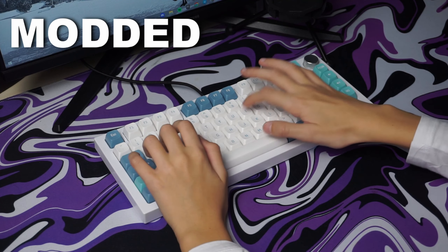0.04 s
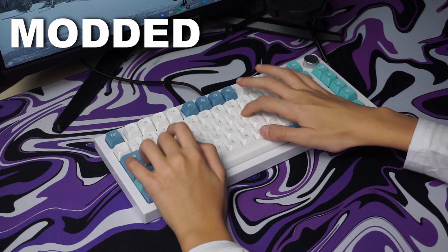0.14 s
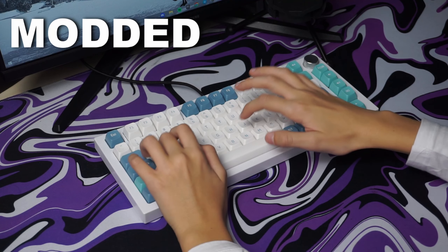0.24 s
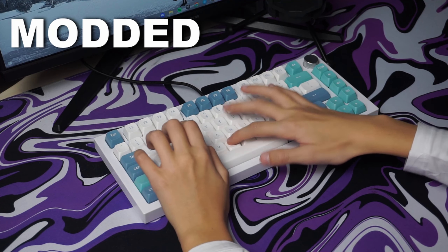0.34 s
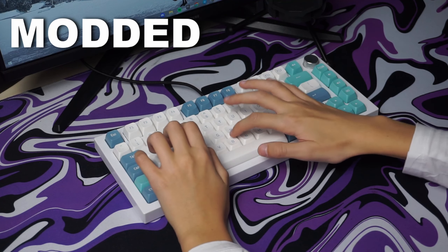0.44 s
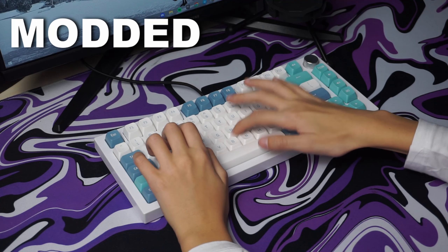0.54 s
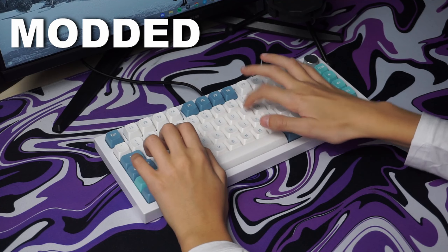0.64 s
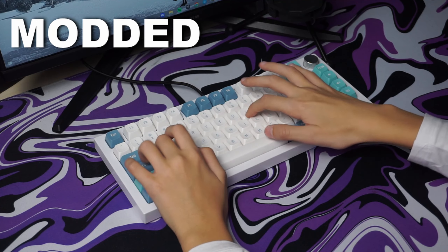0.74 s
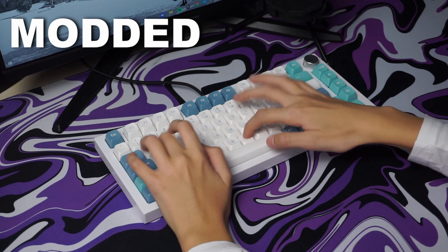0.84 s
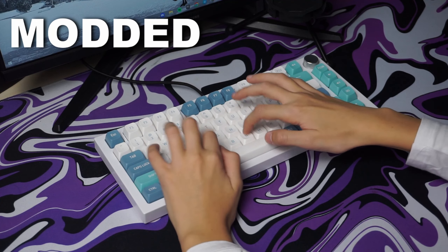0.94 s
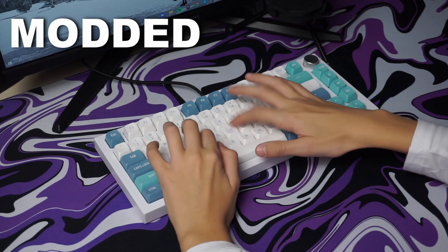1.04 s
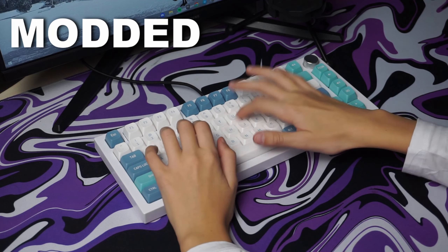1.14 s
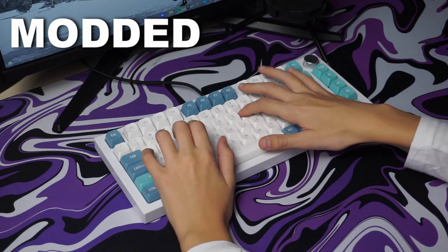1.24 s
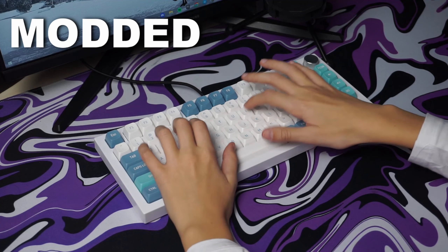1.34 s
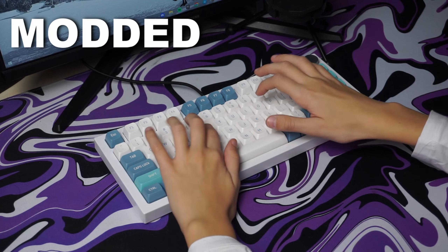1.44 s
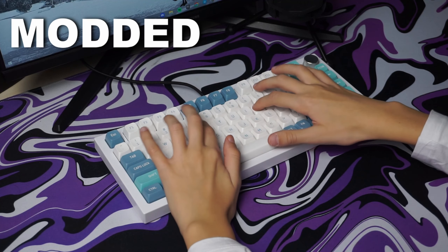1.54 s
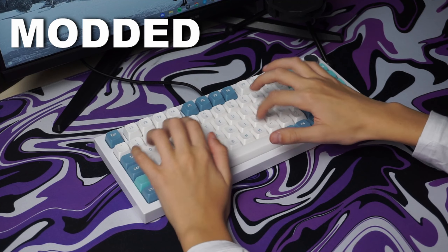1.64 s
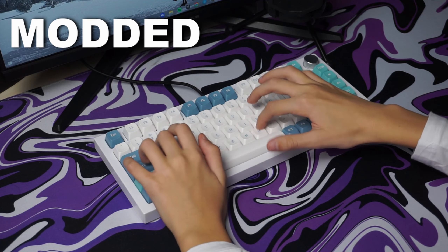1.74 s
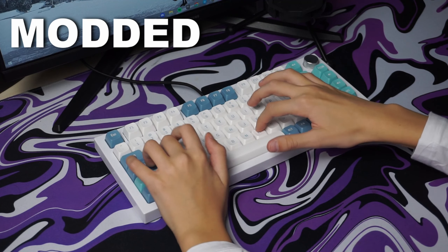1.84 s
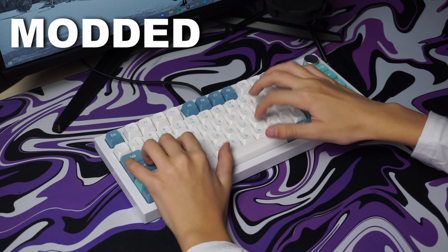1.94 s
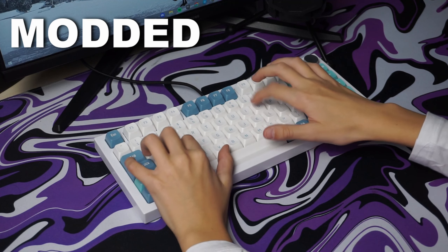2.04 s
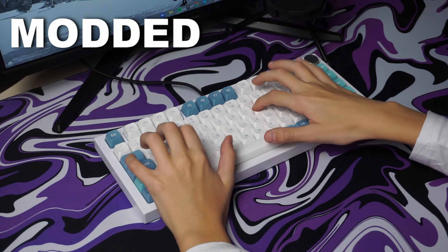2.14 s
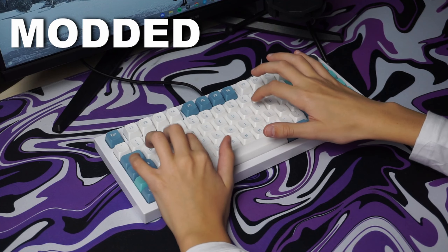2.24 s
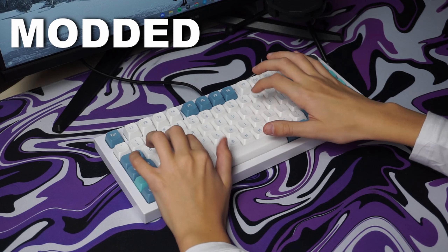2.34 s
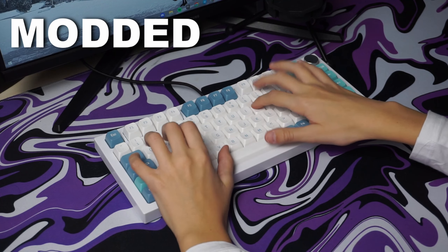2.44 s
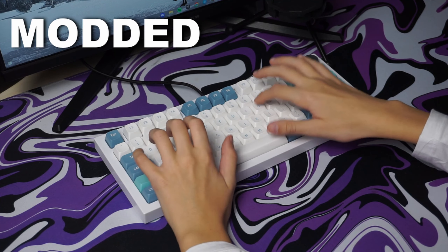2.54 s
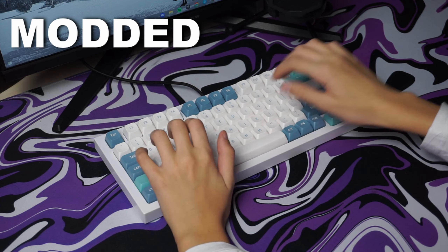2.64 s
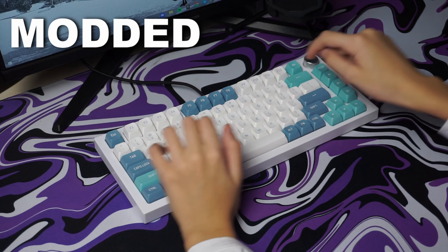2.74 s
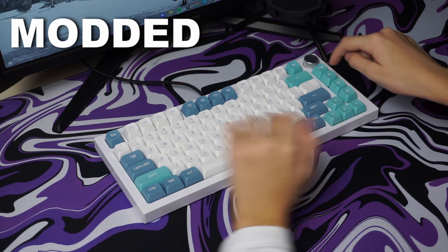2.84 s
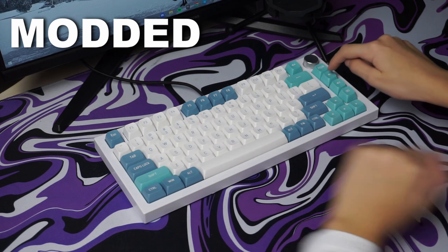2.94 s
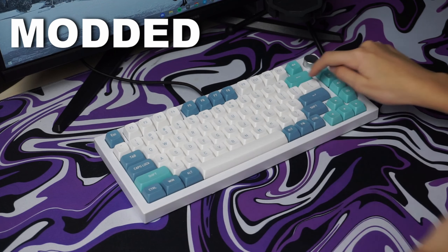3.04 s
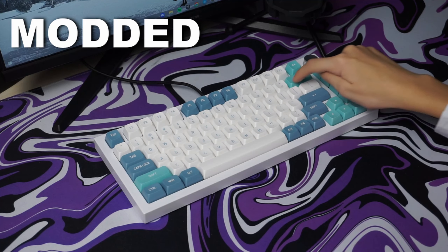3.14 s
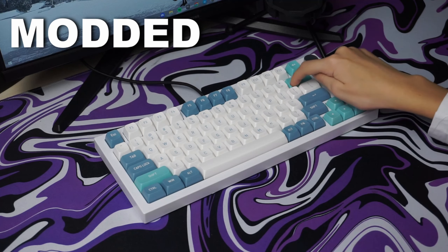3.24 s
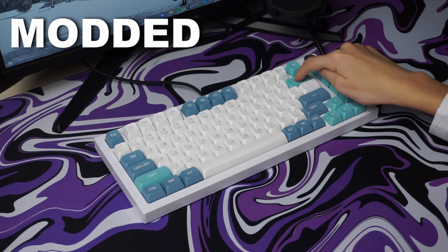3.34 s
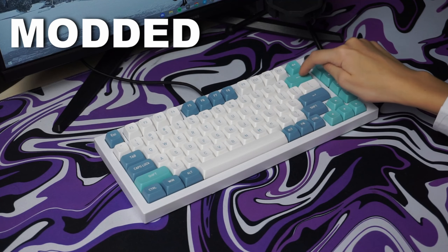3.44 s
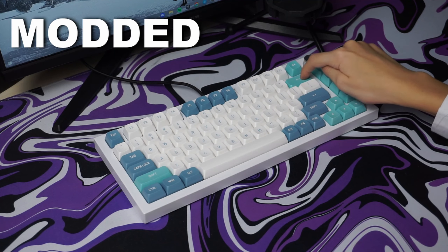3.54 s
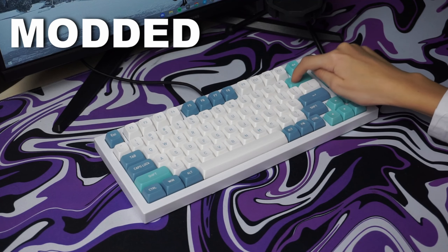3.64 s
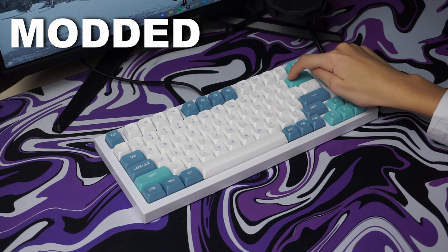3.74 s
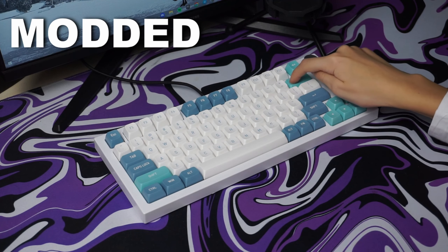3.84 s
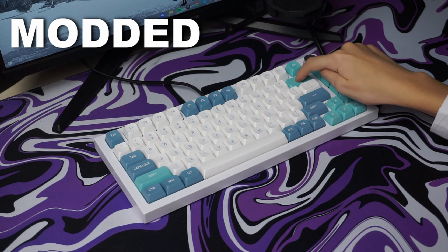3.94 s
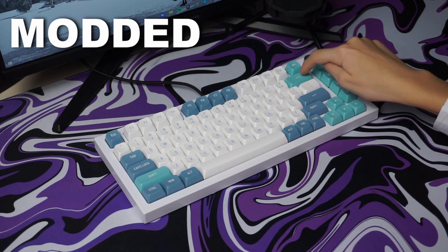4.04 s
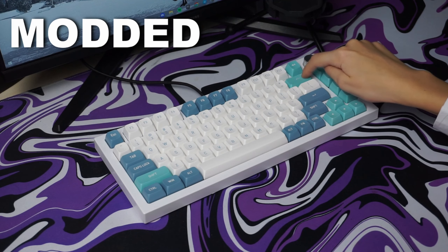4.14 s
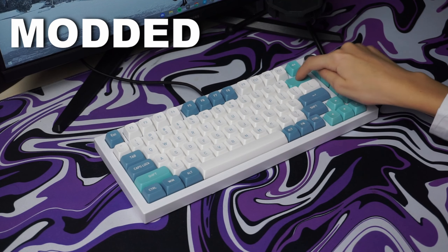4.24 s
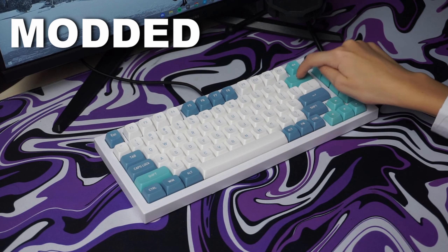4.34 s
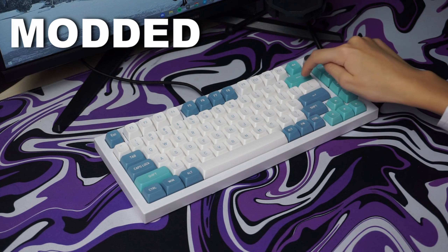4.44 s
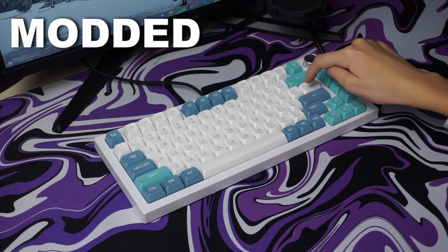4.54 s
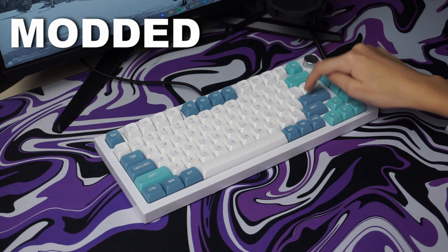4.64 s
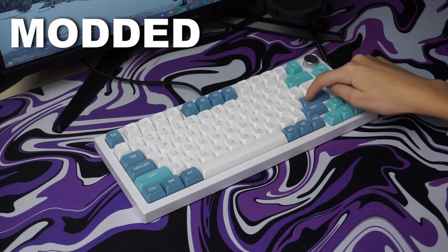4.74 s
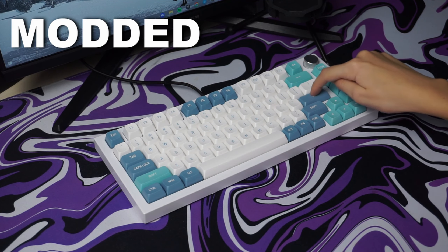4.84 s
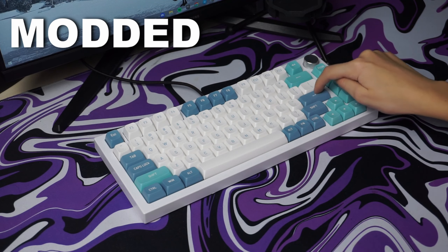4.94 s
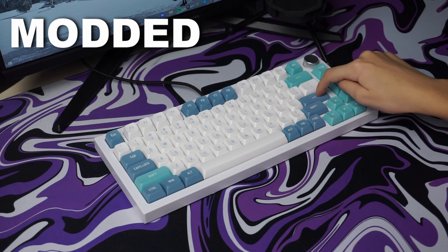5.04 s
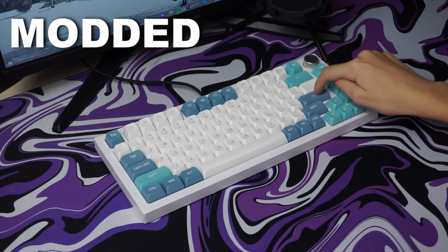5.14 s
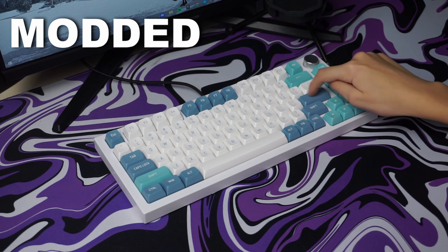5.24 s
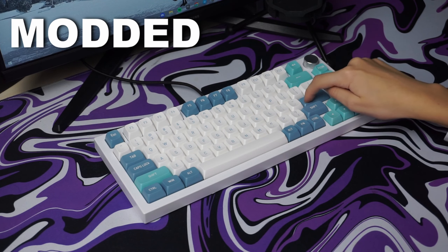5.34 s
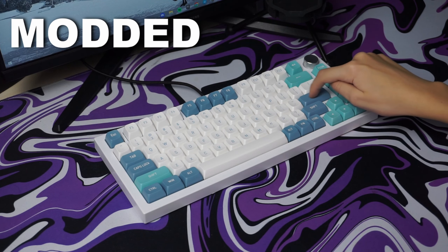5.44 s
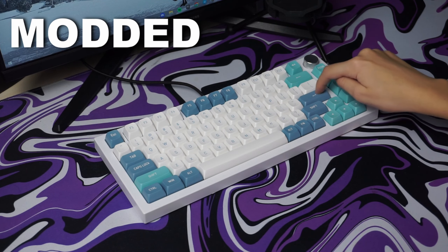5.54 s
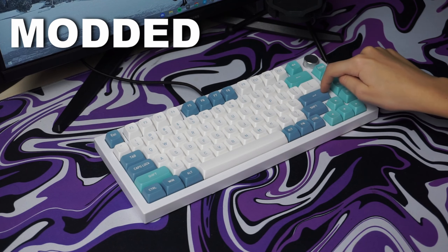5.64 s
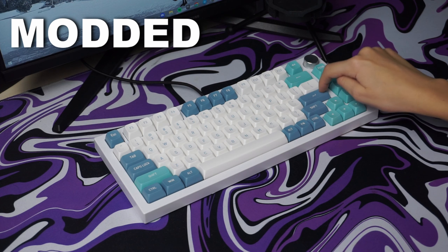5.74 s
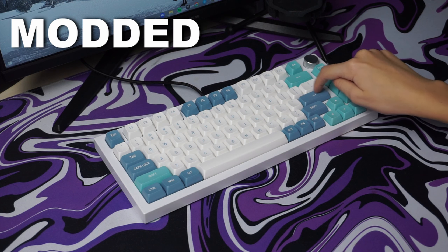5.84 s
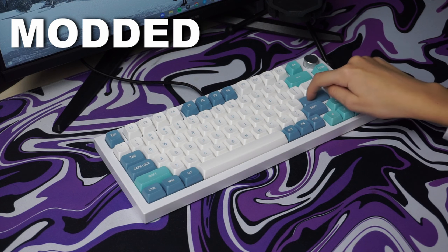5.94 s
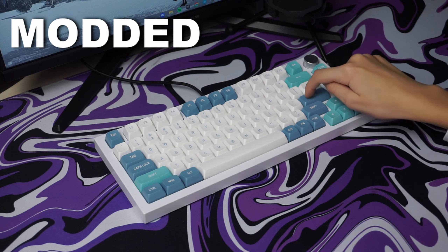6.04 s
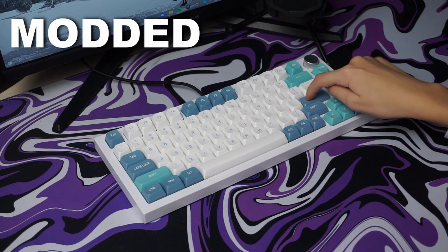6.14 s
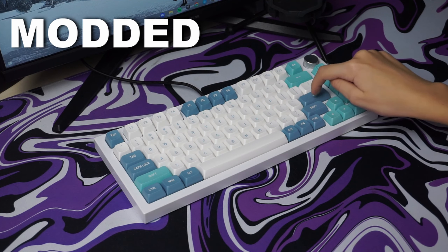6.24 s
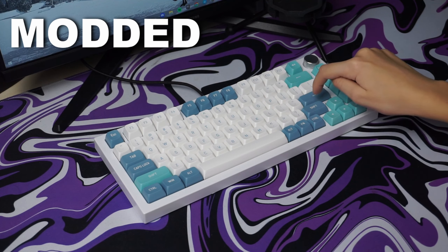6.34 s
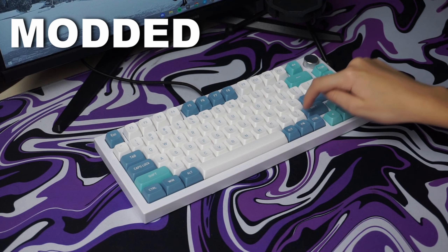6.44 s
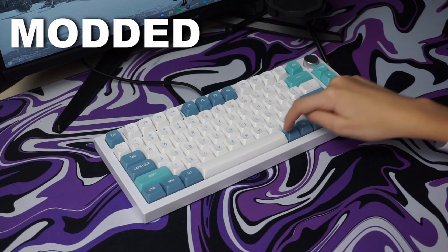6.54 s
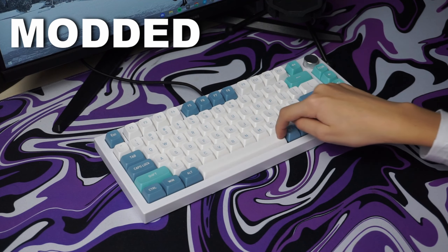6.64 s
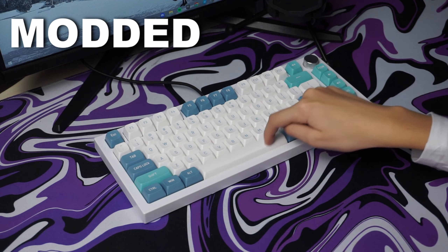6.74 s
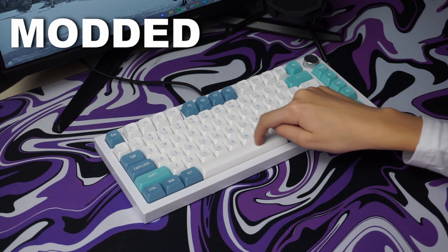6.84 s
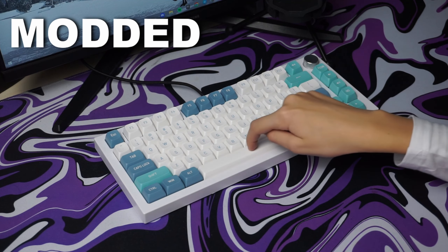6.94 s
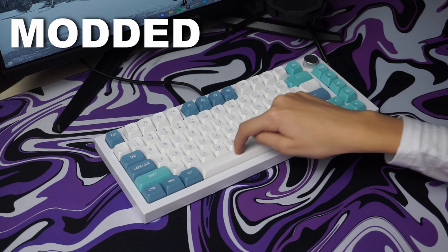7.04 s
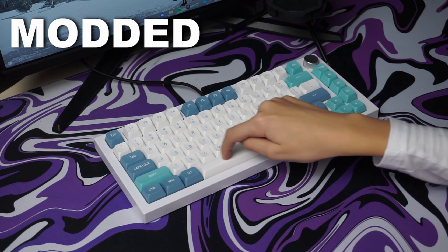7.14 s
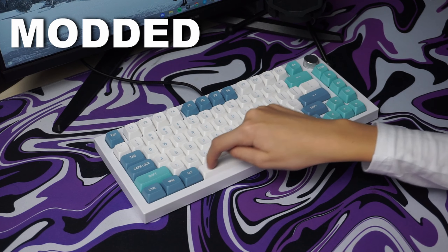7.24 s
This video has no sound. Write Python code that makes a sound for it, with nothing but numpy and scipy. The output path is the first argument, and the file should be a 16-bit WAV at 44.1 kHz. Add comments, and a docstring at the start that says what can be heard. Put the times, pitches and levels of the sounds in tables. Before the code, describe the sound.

Two hands type on a muted mechanical keyboard, then one finger taps backspace, enter and the space bar in separate runs.

```python
"""Quick, woody clacks: two hands type a phrase on a damped mechanical keyboard, close up in a small room.
Then one finger taps backspace, enter and the space bar in turn. Each key knocks as it bottoms out and
again as it springs back: plastic clacks, spring and plate ring faintly, the desk thuds under its mat.
Beneath lie room tone, desk sway and the brush of skin and sleeve. The hardest hits clip at full scale."""
import sys
import numpy as np
from scipy import signal
from scipy.fft import rfft, irfft
from scipy.io import wavfile

SR = 44100
rng = np.random.default_rng(int(sys.argv[2]) if len(sys.argv) > 2 else 0)


def to_wav(s):
    """Save 16-bit WAV."""
    ch = np.atleast_2d(s).T  # columns
    pcm = np.round(np.clip(ch, -1, 1) * 32767)  # PCM
    wavfile.write(sys.argv[1], SR, pcm.astype(np.int16))


N = 321489
STROKE_S = .4
T = np.arange(int(STROKE_S * SR)) / SR
CLACK_LOW_HZ, CLACK_HIGH_HZ = 1600, 3500  # thock lies below this band, tick above it


def undb(db):
    return 10 ** (np.asarray(db) / 20)


def unit(x):
    """Scale to rms 1."""
    return x / np.sqrt(np.mean(x ** 2))


def attack_rms(x, attack_s=.006):
    return np.sqrt(np.mean(x[:int(attack_s * SR)] ** 2))


def fade(t60_s, t=T):
    """Exponential decay, 60 dB down after t60_s."""
    return np.exp(-np.log(1000) * t / t60_s)


def since(start_s):
    """Seconds since start_s; zero before it."""
    return np.maximum(np.arange(N) / SR - start_s, 0)


def butter(x, hz, kind, order=2):
    return signal.sosfilt(signal.butter(order, hz, kind, fs=SR, output="sos"), x)


def filtered_noise(size, hz, kind, order=2):
    return unit(butter(rng.standard_normal(size), hz, kind, order))


def coloured_noise(colour, size):
    """Noise of rms 1, shaped by (freq_hz, gain_db) points."""
    hz, db = np.transpose(colour)
    freq_hz = np.fft.rfftfreq(size, 1 / SR)
    gain = undb(np.interp(np.log(freq_hz + 1), np.log(hz), db))
    return unit(irfft(rfft(rng.standard_normal(size)) * gain, size))


def add(track, start_s, sound):
    """Mix a sound in, trimmed to the track."""
    i = int(start_s * SR)
    i, sound = max(i, 0), sound[max(-i, 0):]
    track[i:i + len(sound)] += sound[:max(N - i, 0)]


# Colour of the room tone: freq_hz, gain_db
ROOM_TONE_COLOUR = [(24, -61.5), (40, -10.5), (81, -9.5), (91, -4.5), (124, -15), (140, -1), (176, -8.5),
                    (204, -2.5), (312, -15), (363, -15.5), (444, -20.5), (529, -19.5), (615, -23.5),
                    (965, -28), (16000, -59)]
def room_tone():
    """A steady, low bed of room noise."""
    return coloured_noise(ROOM_TONE_COLOUR, N) * undb(-36.5)


# Arms jolting the desk: start_s, level_db
DESK_JOLTS = [(1.05, -24), (2.16, -24), (2.38, -27), (3.25, -21), (6.72, -33)]
def desk_sway(rise_s=.038, t60_s=2, rest_db=-45.5):
    """Each jolt sets the desk swaying: a sub rumble that swells and settles."""
    jolts = sum(undb(db) * (1 - np.exp(-since(s) / rise_s)) * fade(t60_s, since(s))
                for s, db in DESK_JOLTS)
    return filtered_noise(N, [17, 24], "band", order=4) * (undb(rest_db) + jolts)


# Fader curve of the sleeve: time_s, level_db
SLEEVE_LEVELS = [(2.6, -91), (2.75, -60), (2.9, -61), (3.1, -68), (3.22, -90)]
def sleeve_slide(grip_db):
    """A sleeve slides with a thin hiss as the hands lift away."""
    level_db = np.interp(np.arange(N) / SR, *np.transpose(SLEEVE_LEVELS))
    return filtered_noise(N, [7600, 10200], "band") * undb(level_db + .5 * grip_db)


# Colour of the skin brush and of the hiss before each knock: freq_hz, gain_db
HISS_COLOUR = [(500, -13.5), (1200, -2.5), (2400, -6.5), (4000, -9.5), (6500, -11.5), (9500, -15),
               (12000, -17), (16000, -18.5)]
# Hand moves across the caps: start_s, length_s, level_db
SKIN_BRUSHES = [(0.947, 0.15, -48), (2.55, 0.58, -55), (6.716, .55, -52.5)]
def skin_brush(grip_db, attack_s=.073, release_s=.12):
    """Skin brushes over the caps, its level fluttering with the grip."""
    contact = sum(undb(db) * np.minimum(since(s) / attack_s, 1) * np.exp(-since(s + length_s) / release_s)
                  for s, length_s, db in SKIN_BRUSHES)
    return coloured_noise(HISS_COLOUR, N) * contact * undb(grip_db)


def background():
    """The quiet bed under the keys; skin and sleeve share one wavering grip."""
    sway = desk_sway()
    grip_db = 3 * filtered_noise(N, 22, "low")
    return sway + skin_brush(grip_db) + sleeve_slide(grip_db) + room_tone()


# Colour of the room's reflections: freq_hz, gain_db
REFLECTION_COLOUR = [(100, 23.5), (400, -2.5), (700, -4.5), (1200, -6), (2200, -7.5), (3500, -7),
                     (6000, -4.5), (10000, -2.5), (16000, -14)]
def room_reflections(x, t60_s=.32, predelay_s=.0041):
    """Sound comes back off desk, screen and walls: grainy at first, then dense."""
    wash = coloured_noise(REFLECTION_COLOUR, len(T))
    grain = np.exp(.5 * fade(.14) * filtered_noise(len(T), 284.5, "low"))
    tail = wash * grain * fade(t60_s) * np.clip(T / predelay_s - 1, 0, 1)
    return signal.fftconvolve(x, tail / np.sqrt(np.sum(tail ** 2)))[:N]


def ring(modes, detune, scatter_db, alternate=True, shortest_s=.003):
    """A struck body: each mode is three close partials that drift out of step."""
    out = np.zeros(len(T))
    for k, (hz, db, t60_s) in enumerate(modes):
        gain = undb(db + scatter_db * rng.standard_normal())
        partial_hz = hz * (1 + detune * rng.standard_normal(3))
        polarity = (-1) ** k if alternate else 1
        t60_s = max(t60_s, shortest_s)
        t = T[T < 2 * t60_s]
        cluster = np.sin(2 * np.pi * np.outer(partial_hz, t)).mean(axis=0)
        out[:len(t)] += polarity * gain * cluster * fade(t60_s, t)
    return out


# Modes of the desk under the keyboard: pitch_hz, level_db, t60_s
DESK_MODES = [(63.6, -2, 0.42), (103, -8, .07), (151.3, -6, 0.16), (188, -0.5, 0.16), (210, -2, 0.01),
              (276, -9, 0.22), (317, -8, 0.031)]
def desk_thud():
    """The desk is heard at the driven point, so its modes all start with the same polarity."""
    return ring(DESK_MODES, detune=.0062, scatter_db=3, alternate=False)


def lead_in_hiss():
    """A faint hiss swells just before each knock."""
    return (coloured_noise(HISS_COLOUR, len(T)) * fade(.063))[::-1]


def metal_ring(band_hz, t60_s):
    """Close modes of a metal part, which outlast the plastic."""
    return filtered_noise(len(T), band_hz, "band") * fade(t60_s)


# Colour of the case's ring: freq_hz, gain_db
CASE_COLOUR = [(200, -14.5), (600, -10.5), (1100, -3), (1700, 1), (2400, -6.5), (3300, -9), (6000, -27),
               (16000, -35.5)]
def case_ring():
    """The case adds a dense cloud of modes that die quickly."""
    return coloured_noise(CASE_COLOUR, len(T)) * fade(.061)


# Colour of the contact crack: freq_hz, gain_db
CRACK_COLOUR = [(800, -24), (2500, -11.5), (4000, 5.5), (7000, 0.5), (10500, 5), (15000, -11)]
def contact_crack():
    """A bright snap at the instant of contact."""
    return coloured_noise(CRACK_COLOUR, len(T)) * fade(.0073)


def stem_chatter(knock, level_db, within_s=.0045):
    """The loose stem knocks three more times, weakly and brightly, just after the blow."""
    out, bright = knock.copy(), butter(knock, 1200, "high", order=1)
    for when, size in rng.random((3, 2)):
        lag = 1 + int((1 + when) * within_s / 2 * SR)
        out[lag:] += undb(level_db) * (2 * size - 1) * bright[:-lag]
    return out


def shelves(knock, thock_db, tick_db):
    """Shelving EQ on both sides of the clack band: a soft or a sharp contact."""
    freq_hz = np.fft.rfftfreq(len(knock), 1 / SR)
    low = 1 / (1 + (freq_hz / CLACK_LOW_HZ) ** 8)
    high = 1 - 1 / (1 + (freq_hz / CLACK_HIGH_HZ) ** 8)
    # minimum phase, so nothing rings ahead of the hit
    cepstrum = irfft(np.log(undb(thock_db * low + tick_db * high)))
    cepstrum[1:len(knock) // 2] *= 2
    cepstrum[len(knock) // 2 + 1:] = 0
    return irfft(rfft(knock) * np.exp(rfft(cepstrum)))


def voice(rows, thock_db, tick_db, thock_per_db=0, tick_per_db=0, thock_per_edge=1, pitch_scatter=.027):
    """Give each (start_s, level_db, edge_db, pitch_ratio) stroke its tone. Force tilts thock and tick
    by the _per_db slopes; edge_db lifts them, as a finger near the cap's edge does."""
    start_s, level_db, edge_db, pitch_ratio = np.transpose(rows)
    force_db = level_db - np.mean(level_db)
    thock = thock_db + thock_per_db * force_db + thock_per_edge * edge_db
    tick = tick_db + tick_per_db * force_db + edge_db
    pitch = pitch_ratio * (1 + pitch_scatter * rng.standard_normal(len(rows)))
    return np.column_stack([start_s, level_db, thock, tick, pitch])


def key(strokes, modes, spring_hz, spring_db, plate_db, case_db, hiss_db,
        desk_db, room_db, crack_db, chatter_db, plate_hz=(2180, 2520)):
    """Layer each stroke: lead-in hiss, plastic knock, crack, metal ring and desk thud, then the room."""
    direct, sideways, desk = np.zeros((3, N))
    for s, db, thock_db, tick_db, pitch in strokes:
        # each cap and finger position shifts the modes of the clack
        shifted = [(hz * (pitch if CLACK_LOW_HZ < hz < CLACK_HIGH_HZ else 1), gain_db, t60_s)
                   for hz, gain_db, t60_s in modes]
        plastic = ring(shifted, detune=.034, scatter_db=2.2)
        blow = plastic / attack_rms(plastic) + undb(crack_db) * contact_crack()
        case = case_ring()
        knock = stem_chatter(blow, chatter_db) + undb(case_db) * case
        knock = shelves(knock, thock_db, tick_db)
        spring = undb(spring_db) * metal_ring(spring_hz, t60_s=.25)
        plate = undb(plate_db) * metal_ring(plate_hz, t60_s=.36)
        add(direct, s, undb(db) * (knock / attack_rms(knock) + spring + plate))
        add(sideways, s, undb(db - 2) * case)  # the case's broad sides radiate into the room
        add(direct, s - STROKE_S, undb(db + hiss_db) * lead_in_hiss())
        add(desk, s, undb(db + desk_db) * desk_thud())
    return direct + desk + undb(room_db) * room_reflections(direct + sideways)


# Caps bumped but not pressed: start_s, level_db, edge_db
CAP_BUMPS = [(0.551, -36.5, -2), (1.1656, -23.5, -4), (3.0187, -36.5, -30), (3.218, -42, 10)]
def fingertips(lead_s=.014, touch_db=-31.5):
    """A fingertip lands softly just before each letter and space, and now and then on its own."""
    landings = [(s - lead_s, db + touch_db, 0) for s, db, *_ in LETTER_PRESSES + SPACE_TAPS]
    touches = voice([(s, db, edge, 1) for s, db, edge in landings + CAP_BUMPS],
                    thock_db=.5, tick_db=.5, thock_per_edge=0)
    return key(touches, LETTER_UP_MODES, LETTER_SPRING_HZ, spring_db=-41, plate_db=-33, case_db=1,
               hiss_db=-26, desk_db=-18, room_db=-6, crack_db=-5.5, chatter_db=-12.5)


# Modes of the space bar, pressed home and at its top stop: pitch_hz, level_db, t60_s
SPACE_DOWN_MODES = [(389, -0.5, 0.037), (664, -7.5, 0.024), (1155, 0.5, 0.045), (1397, 4, 0.018),
                    (1717, 0, 0.034), (2210, 4, 0.011), (2860, -3, 0.0079), (3345, -12.5, 0.033),
                    (4010, -8, 0.035), (6880, -12, 0.014), (9980, -15, 0.014)]
SPACE_UP_MODES = [(426, -4.5, 0.041), (728, -12, 0.06), (1223, -5, 0.055), (1450, -4, 0.01),
                  (2355, -0.5, 0.03), (2940, 3, 0.0055), (3836, -0.5, 0.033), (4670, -9, 0.03),
                  (6840, -11, 0.015), (9950, -15, 0.011), (11100, -10, 0.0036)]
# Space bar hits: start_s, level_db, edge_db, return_s, return_db
SPACE_TAPS = [(1.3752, -15.5, -4, 1.4822, -8), (2.01, -6, 4.5, 2.1571, -7),
              (2.4346, -5.5, 4.5, 2.5571, -8.5), (6.6595, -2.5, 0.5, 6.7337, -18.5),
              (6.8032, -10.5, -2, 6.8856, -17), (6.954, -6, -2, 7.0394, -17.5),
              (7.1308, -16, -0.5, 7.2016, -13.5)]
def space_bar(wire_hz=(3800, 3960)):
    """The long bar thocks going down; its wire pings as it comes back."""
    down = voice([(s, db, edge, 1) for s, db, edge, _, _ in SPACE_TAPS],
                 thock_db=-3, tick_db=1.5, thock_per_db=-.7, tick_per_db=-.33, thock_per_edge=.57)
    up = voice([(s, db, edge, 1) for _, _, edge, s, db in SPACE_TAPS],
               thock_db=4, tick_db=5, thock_per_db=-1.22, tick_per_db=-.58)
    return (key(down, SPACE_DOWN_MODES, wire_hz, spring_db=-41, plate_db=-26.5, case_db=-9,
                hiss_db=-28, desk_db=-14.5, room_db=-10, crack_db=-9.5, chatter_db=-23.5)
            + key(up, SPACE_UP_MODES, wire_hz, spring_db=-22.5, plate_db=-27, case_db=-9,
                  hiss_db=-28, desk_db=-12.5, room_db=-11, crack_db=-1.5, chatter_db=-18))


# Modes of enter, pressed home and at its top stop: pitch_hz, level_db, t60_s
ENTER_DOWN_MODES = [(415, -21.5, 0.047), (892, -4, 0.018), (1188, -4.5, 0.057), (1402, -14, 0.063),
                    (1716, -9, 0.021), (2104, 4.5, 0.013), (2590, -11.5, 0.026), (3090, -39, 0.009),
                    (3630, -18, 0.019), (4340, -20, 0.012), (6200, -10.5, 0.0046)]
ENTER_UP_MODES = [(417, -14.5, 0.086), (588, -11.5, 0.043), (952, 2, 0.027), (1350, -6, 0.05),
                  (1680, -2, 0.0053), (2160, 3.5, 0.0044), (3420, -12, 0.01), (4380, -4, 0.0041),
                  (6520, -6.5, 0.0066), (6170, -15.5, 0.0032), (9800, -18.5, 0.014)]
# Enter hits, all on one spot of the cap: start_s, level_db, return_s, return_db
ENTER_TAPS = [(4.7346, -.5, 4.8162, -12), (4.906, -11.5, 4.9788, -16.5), (5.0505, -11, 5.1359, -16),
              (5.2097, -8.5, 5.2837, -9.5), (5.3732, -3, 5.45, -10.5), (5.8101, -11.5, 5.8865, -15.5),
              (5.9783, -2, 6.0553, -11), (6.1287, -3, 6.218, -11)]
# Half presses that rock the key against its top stop, and one fingernail tick on the cap: start_s, level_db,
# edge_db
ENTER_ROCKS = [(5.5951, -24.5, 0.5), (5.7209, -21.5, 2.5), (5.786, -28, 26)]
def enter(spring_hz=(5700, 6700)):
    """Enter knocks down and springs back; in a pause it rocks against its top stop, and a fingernail ticks on
    the cap."""
    down = voice([(s, db, 0, 1) for s, db, _, _ in ENTER_TAPS],
                 thock_db=0, tick_db=2, thock_per_db=-.8, tick_per_db=.04)
    up = voice([(s, db, 0, 1) for _, _, s, db in ENTER_TAPS],
               thock_db=-4.5, tick_db=-5, thock_per_db=-.34, tick_per_db=.34)
    rocks = voice([(s, db, edge, 1) for s, db, edge in ENTER_ROCKS],
                  thock_db=-2.8, tick_db=-10, thock_per_edge=0)
    return (key(down, ENTER_DOWN_MODES, spring_hz, spring_db=-38.5, plate_db=-37, case_db=-22,
                hiss_db=-35, desk_db=-24, room_db=-11, crack_db=-11, chatter_db=-28)
            + key([*up, *rocks], ENTER_UP_MODES, spring_hz, spring_db=-32.5, plate_db=-46.5,
                  case_db=-21.5, hiss_db=-31, desk_db=-20.5, room_db=-10.5, crack_db=-4.5,
                  chatter_db=-7.5))


# Modes of backspace, pressed home and at its top stop: pitch_hz, level_db, t60_s
BACKSPACE_DOWN_MODES = [(284, -32, 0.0067), (833, -19, 0.059), (1167, -9, 0.042), (1580, -15, 0.056),
                        (1933, -5, 0.017), (2570, 2.5, 0.011), (2777, -14.5, 0.03), (3380, -21, 0.008),
                        (3865, -4, 0.0061), (5110, -14.5, 0.014), (6450, -17.5, 0.0066)]
BACKSPACE_UP_MODES = [(415, -10.5, 0.048), (736, -8.5, 0.056), (1036, -1.5, 0.051), (1218, -3, 0.051),
                      (1470, -3, 0.0087), (1940, -5.5, 0.02), (2580, 6.5, 0.0083), (5170, -4.5, 0.016),
                      (6751, -2.5, 0.0096), (10050, -1.5, 0.019), (12460, -6.5, 0.015)]
# Backspace hits: start_s, level_db, edge_db, return_s
BACKSPACE_TAPS = [(3.2344, -8.5, -8.5, 3.3038), (3.3866, -2, 1.5, 3.4636), (3.5456, -12, -3, 3.6139),
                  (3.701, -13, -0.5, 3.7673), (3.8364, -4, -6.5, 3.91), (3.985, -10.5, 7.5, 4.0568),
                  (4.1372, -8, -5, 4.2058), (4.2839, -7, 2.5, 4.3659)]
def backspace(spring_hz=(5130, 5400), return_db=-15):
    """Backspace clacks down; its spring always returns it with the same force."""
    down = voice([(s, db, edge, 1) for s, db, edge, _ in BACKSPACE_TAPS],
                 thock_db=0, tick_db=1.4, tick_per_db=.6, thock_per_edge=1.25)
    up = voice([(s, return_db, 0, 1) for *_, s in BACKSPACE_TAPS], thock_db=2, tick_db=.2)
    return (key(down, BACKSPACE_DOWN_MODES, spring_hz, spring_db=-42, plate_db=-24, case_db=-9.5,
                hiss_db=-35.5, desk_db=-20, room_db=-11.5, crack_db=-11.5, chatter_db=-29)
            + key(up, BACKSPACE_UP_MODES, spring_hz, spring_db=-31, plate_db=-33.5, case_db=-13,
                  hiss_db=-27, desk_db=-21.5, room_db=-10, crack_db=-5.5, chatter_db=-13.5))


LETTER_SPRING_HZ = (10100, 11100)
# Modes of a letter's cap, switch and plate, pressed home and at the top stop: pitch_hz, level_db, t60_s
LETTER_DOWN_MODES = [(413, -33, 0.1), (837, -20, 0.062), (1090, -1.5, 0.039), (1142, 0.5, 0.021),
                     (1468, -7.5, 0.036), (2070, 2.5, 0.0062), (2292, 2.5, 0.018), (2600, -3.5, 0.0096),
                     (3670, -15, 0.019), (5750, -13, 0.0017), (10000, -12.5, 0.0099)]
LETTER_UP_MODES = [(447, -22.5, 0.11), (743, -10.5, 0.02), (1000, -9, 0.073), (1200, -7, 0.046),
                   (1470, -12, 0.082), (1700, -6, 0.0032), (2387, 5, 0.009), (2770, -12.5, 0.048),
                   (3500, -4, 0.0053), (8500, -8.5, 0.0083), (10520, -7.5, 0.0051)]
# Letters bottoming out: start_s, level_db, edge_db, pitch_hz
LETTER_PRESSES = [(0.1241, -7.5, -3, 2340), (0.3854, -7.5, 2, 2170), (0.5873, -14, 3, 2350),
                  (0.7144, -4, -4, 2270), (0.891, -7.5, -0.5, 1810), (0.8933, -11, -2, 1840),
                  (0.9984, -2.5, -0.5, 2110), (1.2686, -9.5, -3, 2270), (1.351, -9, -4, 2360),
                  (1.5609, -8, 4.5, 2340), (1.734, -7.5, -1.5, 2440), (1.8586, -13, -1.5, 2450),
                  (2.1168, -6.5, 1, 2370), (2.2981, -9.5, -0.5, 2415), (2.487, -1, -8.5, 2164)]
# Letters springing back or lightly touched: start_s, level_db, edge_db
LETTER_RETURNS = [(0.001, -21, 0.5), (0.116, -23.5, 9), (0.195, -14, -5), (0.2052, -18, -5.5),
                  (0.3034, -19, 1.5), (0.459, -17.5, 4.5), (0.7757, -26, -1.5), (0.7865, -17, -2),
                  (0.7986, -14.5, -4.5), (0.9812, -18, .5), (1.0868, -16.5, 2), (1.1116, -19, -6.5),
                  (1.1748, -14.5, 0.5), (1.572, -18.5, -1), (1.6496, -15, 2), (1.8027, -20, 1),
                  (1.9504, -18.5, -5), (2.0552, -19.5, 4.5), (2.1493, -20.5, 20), (2.2207, -18, 2.5),
                  (2.291, -22, 9), (2.4158, -14.5, 12), (2.566, -21, 5)]
def letters(average_cap_hz=2303):
    """The phrase: each cap clacks down at its own pitch; releases and light touches fall in between."""
    down = voice([(s, db, edge, hz / average_cap_hz) for s, db, edge, hz in LETTER_PRESSES],
                 thock_db=-4.5, tick_db=0, thock_per_db=-.84, tick_per_db=-.15, thock_per_edge=1.1)
    up = voice([(s, db, edge, 1) for s, db, edge in LETTER_RETURNS], thock_db=2.5, tick_db=1.3)
    return (key(down, LETTER_DOWN_MODES, LETTER_SPRING_HZ, spring_db=-36, plate_db=-26, case_db=-12.5,
                hiss_db=-32, desk_db=-22.5, room_db=-10, crack_db=-4.5, chatter_db=-24)
            + key(up, LETTER_UP_MODES, LETTER_SPRING_HZ, spring_db=-30, plate_db=-24, case_db=-12,
                  hiss_db=-29, desk_db=-19.5, room_db=-7.5, crack_db=-2, chatter_db=-4))


def scene():
    """The keys over the quiet room, in mono."""
    return (letters() + fingertips() + backspace() + enter() + space_bar() + background())[None]


def record(dry, top_hz=16000):
    """The hardest hits clip at full scale; a steep low-pass trims the top."""
    clipped = np.clip(dry, -1, 1)
    return signal.sosfilt(signal.ellip(8, .2, 70, top_hz, fs=SR, output="sos"), clipped)


dry = scene()
out = record(dry)
to_wav(out)
```